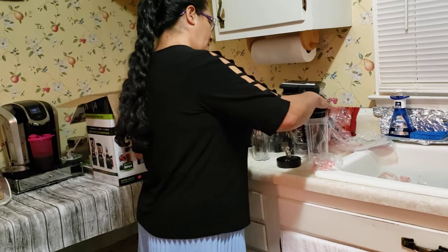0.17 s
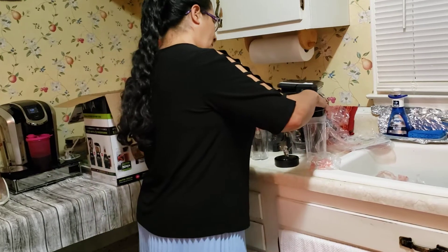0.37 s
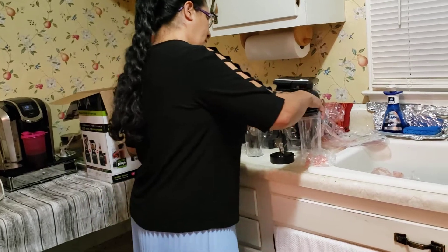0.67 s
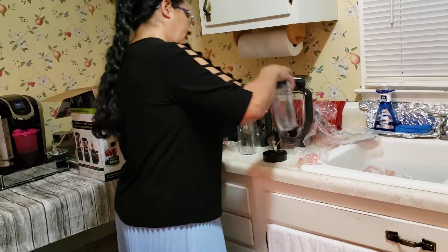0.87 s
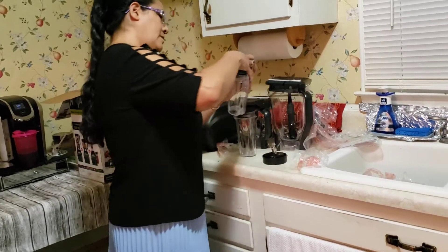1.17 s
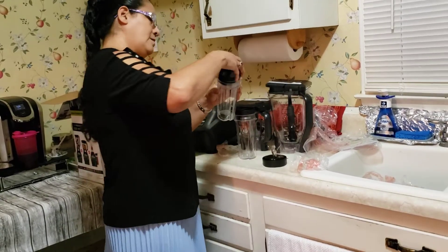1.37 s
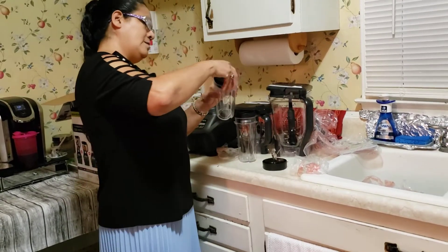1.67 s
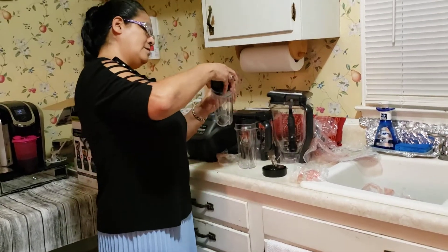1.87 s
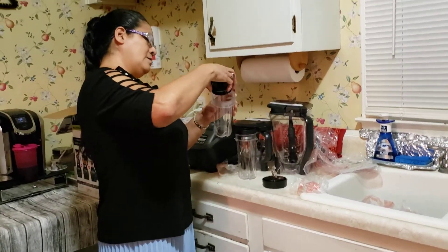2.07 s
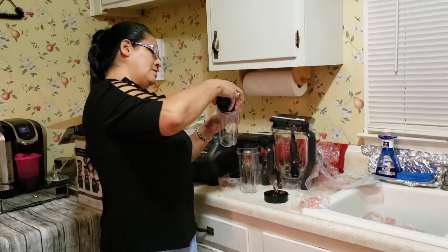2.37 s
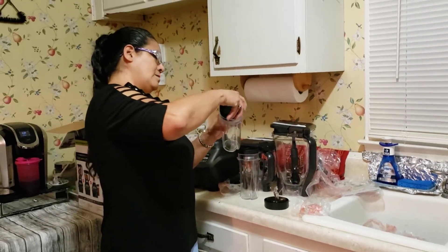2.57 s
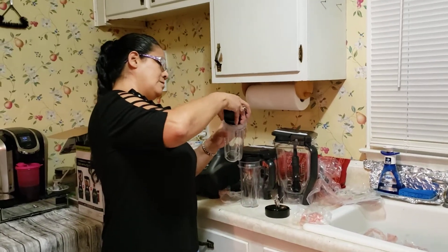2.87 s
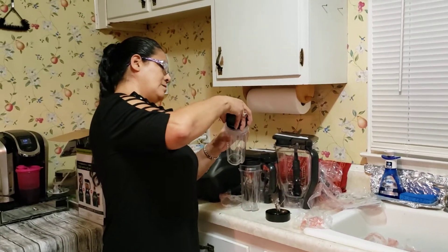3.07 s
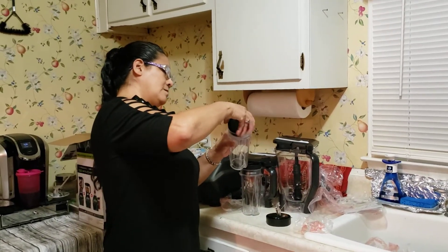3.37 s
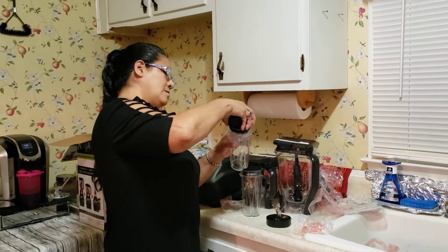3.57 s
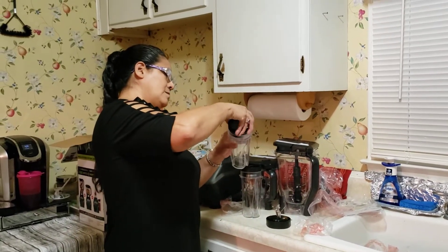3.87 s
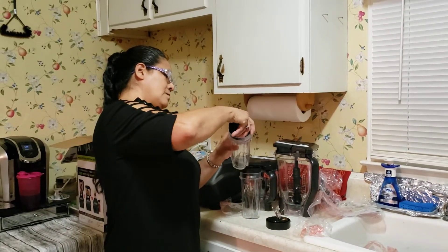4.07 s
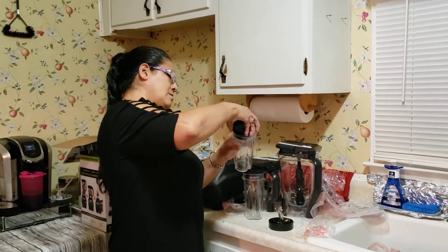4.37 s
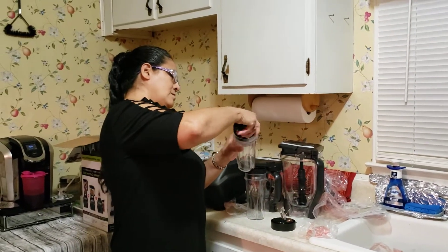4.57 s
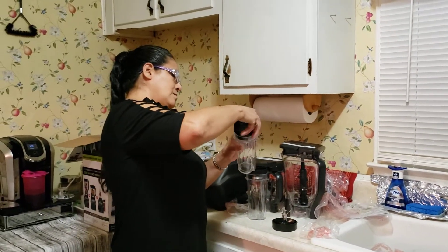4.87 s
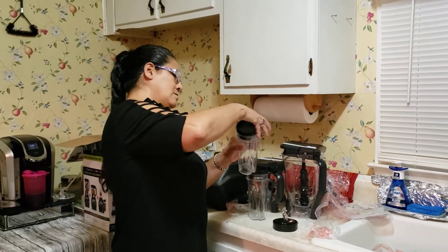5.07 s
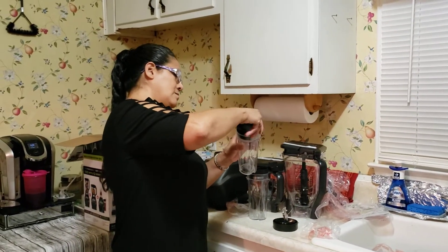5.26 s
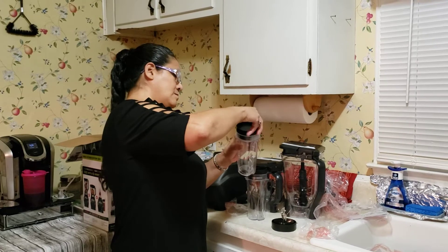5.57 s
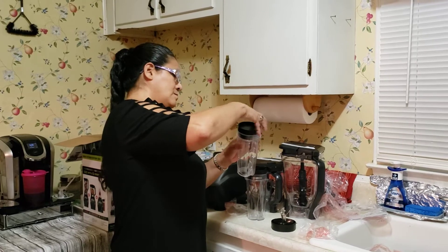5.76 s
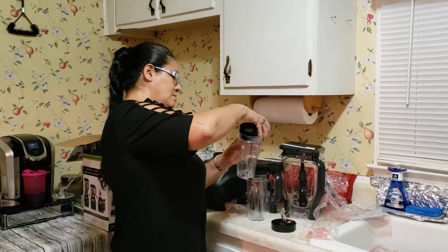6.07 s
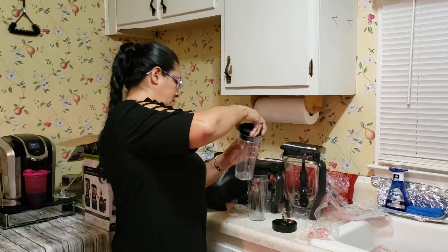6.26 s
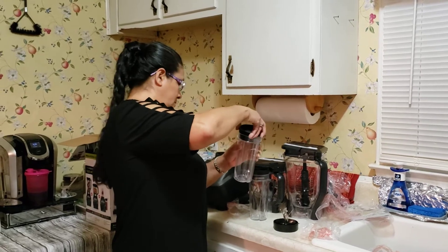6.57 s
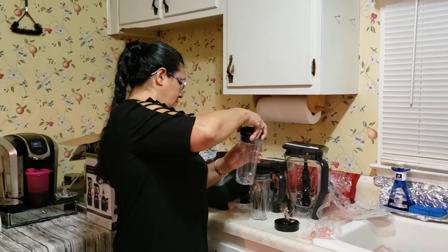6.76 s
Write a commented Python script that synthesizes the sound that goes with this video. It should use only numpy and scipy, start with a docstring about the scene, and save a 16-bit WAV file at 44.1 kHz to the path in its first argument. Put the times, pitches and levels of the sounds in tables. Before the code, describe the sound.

After brief crinkling and a sharp rim clink, a plastic lid is fitted on a cup with hollow knocks, rubs and faint squeaks.

```python
"""In a small kitchen, over low rumble, thin hiss and a faint mains hum, a hard plastic cup is drawn out of
crinkly wrapping (gated noise) and bumps the counter (blows on decaying modes), then its rim clinks.
Its lid is then pressed on and twisted: each knock or thread slip thumps the air inside, rings the wall
and ticks, while fingers rub and whisper (grainy noise); near the end the lid squeaks airily (narrow noise).
Noise-built reflections and tails answer the handling from cabinets and walls."""
import sys
import numpy as np
from scipy import signal
from scipy.fft import rfft, irfft, next_fast_len
from scipy.io import wavfile
from scipy.ndimage import uniform_filter1d

SR = 44100
rng = np.random.default_rng(int(sys.argv[2]) if len(sys.argv) > 2 else 0)


def waveform_to_disk(signal):
    """Save audio, clipped to [-1, 1], as 16-bit WAV at the path in sys.argv[1]."""
    frames = np.transpose(np.atleast_2d(signal))
    scaled = np.clip(frames, -1, 1) * 32767
    samples = np.round(scaled).astype(np.int16)
    wavfile.write(sys.argv[1], SR, samples)


N = 305110
T = np.arange(N) / SR
AGE = T[:SR * 3 // 4]  # time since a blow, s

# resonances of the cup wall: f/Hz, relative level/dB, t60/s
WALL_MODES = [(633, -5.5, 0.015), (889, -14.5, 0.043), (1090.3, -9, 0.14), (1200, -12, 0.045),
              (1381, -3.5, 0.037), (1495, -9.5, 0.018), (1740, -5.5, 0.014), (1882, 6, 0.016),
              (2000, 7, 0.0075), (2183, -14, 0.025)]
# colour of hard plastic contact: f/Hz, gain/dB
TICK_COLOUR = [(400, 17), (2000, -5), (3500, 3), (5000, 0), (7300, 5), (8700, -0.5), (11000, 4), (16000, 4)]
# a gentle contact drives little treble: f/Hz, gain/dB
SOFT_COLOUR = [(2100, -1.5), (2500, -11), (6000, -23)]


def undb(db):
    """Decibels to gain."""
    return 10 ** (np.asarray(db) / 20)


def level(x, db):
    """Set the overall rms."""
    return x * undb(db) / np.sqrt(np.mean(x ** 2))


def peak_level(x, db):
    """Set the rms of the loudest 20 ms of a stereo sound, heard as the mean of its channels."""
    power = uniform_filter1d(x.mean(0) ** 2, size=SR // 50, mode="constant")
    return x * undb(db) / np.sqrt(power.max())


def colour(x, points):
    """Minimum-phase filter through (f/Hz, gain/dB) points, so nothing sounds ahead of its cause."""
    n = 2 * next_fast_len(x.shape[-1] // 2 + SR // 20)
    hz, db = np.transpose(points)
    bin_hz = np.arange(n // 2 + 1) * SR / n
    gain = undb(np.interp(np.log(bin_hz + 1), np.log(hz), db))
    # folding the cepstrum onto positive time gives the causal phase
    cepstrum = irfft(np.log(gain))
    cepstrum[1:n // 2] *= 2
    cepstrum[n // 2 + 1:] = 0
    return irfft(rfft(x, n) * np.exp(rfft(cepstrum)))[..., :x.shape[-1]]


def balance(x, points):
    """Lean each frequency to the left or right by (f/Hz, left minus right/dB) points."""
    left = colour(x[0], [(hz, db / 2) for hz, db in points])
    right = colour(x[1], [(hz, -db / 2) for hz, db in points])
    return np.array([left, right])


def convolve(x, response):
    """Pass x through one response per channel, keeping its length."""
    return signal.fftconvolve(np.atleast_2d(x), np.atleast_2d(response), axes=-1)[:, :x.shape[-1]]


def add(out, s, x):
    """Mix x in at time s."""
    i = max(int(s * SR), 0)
    out[:, i:i + x.shape[-1]] += x[:, :N - i]


def ring(modes, detune):
    """Decaying modes; the grip shifts each a little from blow to blow."""
    out = np.zeros(len(AGE))
    for hz, db, t60 in modes:
        shifted_hz = hz * (1 + detune * rng.standard_normal())
        polarity = rng.choice([-1, 1])
        out += polarity * undb(db - 60 * AGE / t60) * np.sin(2 * np.pi * shifted_hz * AGE)
    return out


def contact(length_s, chatter):
    """A first impact, then a dying run of tiny slips."""
    happens = rng.random(len(AGE)) < 1500 / SR  # about 1500 slips a second
    slips = rng.standard_normal(len(AGE)) * happens * np.exp(-AGE / max(length_s, .001))
    force = chatter * slips / (np.linalg.norm(slips) + 1e-9)
    force[0] += 1
    return force


def grains(spread_db):
    """Dense noise at rms 1 whose size jumps unevenly every 32 samples, like micro-clicks."""
    size_db = spread_db * np.minimum(rng.exponential(size=N // 32 + 1), 6)
    size = np.repeat(undb(size_db), 32)[:N]
    return level(size * rng.standard_normal(N), 0)


def kitchen(x, wet_db, t60, early_db, width):
    """Direct sound, close reflections off cabinets and counter, then the room's tail."""
    mid, side = rng.standard_normal((2, len(AGE)))
    tail = undb(-60 * AGE / t60)
    early = undb(early_db) * np.exp(-AGE / 0.029)
    decay = (tail + early) * (1 - np.exp(-AGE / 0.0018))
    stereo = mid + width * side * np.array([[1], [-1]])
    response = stereo * decay * undb(wet_db) / np.linalg.norm(decay)
    response[:, 0] += 1  # direct sound
    return convolve(x, response)


def waver():
    """Slow random drift at rms 1, mostly below 10 Hz."""
    return level(colour(rng.standard_normal(N), [(3, 1.5), (10, -17), (60, -82.0), (300, -120)]), 0)


def background():
    """Coloured noise gives low rumble and thin hiss; sines wavering in level and phase give the hum."""
    # spectrum of the still kitchen: f/Hz, relative level/dB
    quiet_colour = [(22, -36.5), (40, -24.5), (58, -2), (85, -10), (150, -12.5), (300, -15.5), (500, -25.5),
                    (900, -39.5), (2200, -42.5), (5600, -48), (6500, -45.5), (7700, -41), (8500, -46.5),
                    (16000, -36)]
    # stereo lean: f/Hz, left minus right/dB
    quiet_lean = [(60, 4.5), (300, 1.5), (3000, 3.5), (5500, 3.5), (7200, 28), (8800, -5.5), (15000, 3)]
    # hum lines ahead of the lean: f/Hz, level/dB
    hum_lines = [(57.2, -65), (165.4, -72), (113.4, -86.5)]
    mid, side = rng.standard_normal((2, N))
    side = colour(side, [(100, -18), (300, -13), (900, -2), (3000, 0)])  # bass stays near the centre
    air = level(colour(mid + side * np.array([[1], [-1]]), quiet_colour), -63.5)
    hum = np.zeros(N)
    for hz, db in hum_lines:
        swell = 1 + 0.13 * waver()
        hum += level(swell * np.sin(2 * np.pi * hz * T + 0.16 * waver()), db)
    return balance(air + hum, quiet_lean)


def wrapping():
    """Thin film crinkles as the cup is drawn past it: each fold gives way quickly and settles slowly."""
    # crinkles: t/s, relative level/dB
    crinkles = [(0, -49), (.078, -48), (0.133, -44), (0.171, -41.5), (0.219, -61), (0.282, -44.5),
                (.34, -46.5), (0.401, -51.5), (.45, -53), (0.573, -51.5), (.665, -60)]
    # colour of the film: f/Hz, gain/dB
    film_colour = [(180, 1.5), (300, -5.5), (343, -12), (392, 4), (1080, -6), (1840, 2), (5800, 0.5),
                   (6850, 3), (8500, -0.5), (14200, 4.5), (16000, 1)]
    attack_s, fall_db_per_s = 0.004, 124.5
    folds = []
    for s, db in crinkles:
        attack = np.clip((T - s) / attack_s, 0, 1)
        folds.append(attack * undb(db - fall_db_per_s * np.maximum(T - s, 0)))
    envelope = np.linalg.norm(folds, axis=0)  # folds add in power
    crinkle = level(colour(grains(spread_db=3.5), film_colour), -3.5) * envelope
    return kitchen(crinkle, wet_db=1.5, t60=0.31, early_db=-12.5, width=1)


def counter():
    """Soft, scuffing bumps ring the counter top, which radiates little bass."""
    # bumps: t/s, level/dB, decay time of the scuff/s, brightness/dB
    bumps = [(0.001, -33.5, 0.0098, 10), (0.052, -41, 0.035, -8), (0.54, -51, 0.062, -5),
             (0.558, -41, 0.036, 2.5)]
    # resonances of the counter top: f/Hz, relative level/dB, t60/s
    top_modes = [(296, 4, 0.028), (368, -2, 0.049), (456.5, -18, 0.16), (549, -7, 0.045), (652, -1, 0.015),
                 (910, -9, 0.015), (1247, -5, 0.019), (1393, -14.5, 0.044), (1750, -7, 0.0035)]
    out = np.zeros((2, N))
    for s, db, length_s, bright_db in bumps:
        body = convolve(contact(length_s, chatter=2.1), ring(top_modes, detune=0.014))
        body = colour(body, [(60, -30), (200, -7), (300, 0), (600, bright_db), (1600, bright_db),
                             (3000, 2 * bright_db)])
        add(out, s, peak_level(kitchen(body, wet_db=1, t60=0.64, early_db=3, width=0.57), db))
    return out


def clink():
    """The hard rim snaps and rings, once clearly and twice faintly, heard mostly by way of the walls."""
    # clinks: t/s, level/dB
    clinks = [(1.085, -33.5), (1.153, -53), (2.638, -61)]
    # clearest resonances of the rim: f/Hz, relative level/dB, t60/s
    rim_modes = [(1930, 1, 0.1), (1924, -6, 0.11), (4300, -8, 0.1), (5662, -20.5, .07),
                 (5830, -14.5, 0.033)]
    # colour of the snap: f/Hz, gain/dB
    snap_colour = [(300, -4.5), (800, -9), (2000, -6.5), (2900, -6), (3450, -19.5), (4000, -0.5), (5500, 3),
                   (7200, -2), (8800, -23), (11000, -6), (15500, -9.5)]
    out = np.zeros((2, N))
    for s, db in clinks:
        snap = colour(contact(0.0006, chatter=0.66), snap_colour)
        rim = level(snap, 0) + level(ring(rim_modes, detune=.001), -9)
        add(out, s, peak_level(kitchen(rim, wet_db=28, t60=0.45, early_db=-3.5, width=0.91), db))
    return out


def rubbing():
    """With each turn the lid grates on the rim and faintly rings the wall, and the fingertips whisper."""
    # turns of the fingers: t at the height of the turn/s, relative grating level/dB
    turns = [(1.40, -77), (1.63, -50), (2.0, -54.5), (2.64, -71), (2.851, -59), (3.48, -73), (4.31, -90),
             (4.45, -74), (4.76, -84), (5.26, -58.5), (5.582, -85), (5.93, -56.5), (6.252, -67),
             (6.559, -73.5)]
    # colour of fingertips sliding on plastic: f/Hz, gain/dB
    whisper_colour = [(3000, -24), (10500, -11), (12600, -6), (13700, 0), (14700, -4), (16000, -14)]
    rise_db_per_s, fall_db_per_s = 193.5, 109
    stroke_s = 0.056  # half length of a whisper, to 1/e
    effort, strokes = np.zeros(N), np.zeros(N)
    for s, db in turns:
        effort += undb(db - np.maximum(rise_db_per_s * (s - T), fall_db_per_s * (T - s)))
        strokes += np.exp(-((T - s) / stroke_s) ** 2)
    friction = grains(spread_db=3.5) * effort
    wall = ring(WALL_MODES, detune=0.0022)
    wall_ring = convolve(colour(friction, SOFT_COLOUR), wall / np.linalg.norm(wall))
    grate = undb(-7.0) * colour(friction, TICK_COLOUR) + undb(-6.5) * wall_ring
    whisper = strokes * level(colour(grains(spread_db=7), whisper_colour), -71)
    return kitchen(undb(-4.5) * grate + whisper, wet_db=2, t60=0.16, early_db=9.5, width=1)


def squeak():
    """A swell of friction noise, passed twice through one narrow resonance, is the lid's airy squeak."""
    # squeaks: t/s, length/s, level/dB
    squeaks = [(5.767, .15, -65.5), (6.441, 0.11, -78.5)]
    squeak_hz, width_hz = 3710, 250  # width of a single pass
    out = np.zeros((2, N))
    resonance = np.exp(-np.pi * width_hz * AGE) * np.sin(2 * np.pi * squeak_hz * AGE)
    for s, length_s, db in squeaks:
        swell = np.sin(np.pi * np.clip(AGE / length_s, 0, 1))
        friction = rng.standard_normal(len(AGE)) * swell
        tone = convolve(convolve(friction, resonance), resonance)
        add(out, s, peak_level(kitchen(tone, wet_db=9, t60=0.6, early_db=-14, width=0.97), db))
    return out


def clacks():
    """The lid's hard edge lands on the bare rim and chatters to rest."""
    # landings: t/s, level/dB
    landings = [(1.457, -46), (2.454, -50), (2.48, -46.5), (3.068, -54), (3.086, -56.5), (3.906, -55),
                (4.943, -58), (6.294, -50.5)]
    # colour of the edge's crack: f/Hz, gain/dB
    crack_colour = [(700, -6), (1300, 3.5), (2300, -13.5), (2700, 10), (3100, -4), (3700, 7.5), (4600, -2),
                    (6500, -22.5)]
    out = np.zeros((2, N))
    for s, db in landings:
        crack = colour(contact(0.027, chatter=1.3), crack_colour)
        add(out, s, peak_level(kitchen(crack, wet_db=5.5, t60=0.44, early_db=4.0, width=0.86), db))
    return out


def graze(length_s, db):
    """The light scrape that leads into a knock and sets the wall ringing."""
    scrape = colour(contact(length_s, chatter=2.8), SOFT_COLOUR)
    wall = convolve(scrape, ring(WALL_MODES, detune=.004))
    return peak_level(kitchen(wall, wet_db=11.5, t60=0.21, early_db=0, width=1.0), db)


def air_thump(hz, swell_s):
    """The lid pumps the air in the cup: a few cycles that swell and leak away."""
    envelope = (AGE / swell_s) ** 2 * np.exp(-2 * AGE / swell_s)
    return envelope * np.sin(2 * np.pi * hz * AGE)


def cup(air_hz, air_db, wall_db, upper_db, tick_db, slip_s):
    """One contact of the lid thumps the air, rings the lower and upper wall modes and ticks."""
    split_hz = 1600
    low_modes = [m for m in WALL_MODES if m[0] < split_hz]
    high_modes = [m for m in WALL_MODES if m[0] >= split_hz]
    # a long slip judders, so its thump is rougher than that of a clean catch
    thump = convolve(contact(slip_s, chatter=slip_s / 0.015), air_thump(air_hz, swell_s=0.0082))
    air = kitchen(thump, wet_db=-4.5, t60=0.47, early_db=-9.5, width=0.16)
    # one force drives wall and tick alike
    force = contact(slip_s, chatter=3.23)
    low_ring = convolve(force, ring(low_modes, detune=0.0053))
    low = kitchen(low_ring, wet_db=0.5, t60=0.39, early_db=-2.5, width=0.93)
    high_ring = convolve(force, ring(high_modes, detune=.005))
    high = kitchen(high_ring, wet_db=4.5, t60=0.53, early_db=3.5, width=1)
    tick = kitchen(colour(force, TICK_COLOUR), wet_db=4, t60=0.63, early_db=4.0, width=0.82)
    wall = peak_level(low, wall_db) + peak_level(high, wall_db + upper_db)
    return peak_level(air, air_db) + wall + peak_level(tick, tick_db)


def lid():
    """Knocks as the lid catches on the cup, and softer, mostly longer slips of its thread."""
    # knocks: t/s, air thump level/dB, lower wall ring over the thump/dB, edge tick over the thump/dB
    knocks = [(1.367, -42.5, -6.5, -22.5), (1.452, -53.5, 17.5, -2), (1.459, -39, 2, -0.5),
              (1.532, -33, -12.5, -18.5), (1.675, -40, -6.5, -21), (1.854, -42, -12, -6.5),
              (1.891, -42.5, -9, -12), (1.961, -45.5, -20, -10.5), (2.41, -46, -12, -5.5),
              (2.453, -34.5, -1.5, -13), (2.477, -37, -2.5, -8.5), (3.038, -72.5, -7, 11.5),
              (3.067, -50.5, 3.5, -7.5), (3.085, -47, 5.5, -30), (3.203, -47, -7, -3.5),
              (3.22, -40, -13.5, -9.5), (3.738, -50, -14.5, -4), (3.775, -47.5, -10, -10.5),
              (3.906, -40.5, -4, -9), (3.971, -41.5, -5.5, -23), (4.03, -46.5, -1, -4.5),
              (4.115, -40, -11, -17.5), (4.535, -42.5, -10.5, -8.5), (4.628, -43, -2.5, -17),
              (4.654, -41, -6, -22), (4.682, -38.5, -7.5, -27), (4.865, -46.5, -2.5, 1.5),
              (4.927, -39, -11, -17.5), (4.943, -34.5, -5, -18.5), (5.28, -43.5, -1.5, -7),
              (5.614, -37.5, -6, -15.5), (6.224, -46, -35, -48), (6.292, -43.5, -1.5, -1)]
    # juddering thread slips: t/s, air thump level/dB, air note f/Hz, decay time of the judder/s
    thread_slips = [(2.019, -56, 333, 0.004), (2.338, -48.5, 410, 0.042), (2.666, -47, 297, 0.027),
                    (2.771, -46.5, 304, 0.031), (3.086, -45.5, 365, 0.063), (3.529, -53.5, 314, 0.036),
                    (3.878, -50.5, 305, 0.024), (4.327, -55.5, 272, 0.08), (4.456, -53.5, 267, .029),
                    (4.494, -47.5, 276, 0.014), (4.829, -47, 290, 0.023), (5.224, -46.5, 284, 0.12),
                    (5.538, -49, 298, 0.077), (5.587, -44, 278, 0.013), (5.89, -54, 259, 0.063)]
    thump_hz, seated_s, sag_hz_per_s = 288.7, 4.77, 17.4  # knocks sink once the thread closes the gap
    firm_db, firm_chatter_s, doubling_db = -45, 0.0079, 28  # harder blows chatter longer
    graze_s, graze_db = 0.0092, -57.5  # lead and scrape decay; level of a full graze
    graze_full_db = -45.5  # knocks that ring the wall less than this are grazed less too
    out = np.zeros((2, N))
    for s, db, wall_db, edge_db in knocks:
        air_hz = thump_hz - sag_hz_per_s * max(s - seated_s, 0)
        blow_db = db + (wall_db + edge_db) / 2  # how hard plastic meets plastic
        chatter_s = firm_chatter_s * 2 ** ((blow_db - firm_db) / doubling_db)
        add(out, s, cup(air_hz, db, db + wall_db, -2.5, db + edge_db, chatter_s))
        graze_gain = min(undb(db + wall_db - graze_full_db), 1)
        add(out, s - graze_s, graze(graze_s, graze_db) * graze_gain)
    for s, db, air_hz, length_s in thread_slips:
        # soft slips ring the upper wall modes less: -10 dB against the lower ones
        add(out, s, cup(air_hz, db, db - 10, -10, db - 15.5, length_s))
    return out


def scene():
    """The handling, heard from the side, over the still kitchen."""
    # stereo lean of the handling: f/Hz, left minus right/dB
    handling_lean = [(300, 1.2), (700, 4.5), (1090, 3.5), (1450, -2.5), (2000, 0.5), (3200, 2.5),
                     (5000, 6.5), (7000, 9.5), (9000, 0.5), (14000, -0.5)]
    handling = wrapping() + counter() + clink() + rubbing() + squeak() + clacks() + lid()
    return background() + balance(handling, handling_lean)


def record(dry):
    """A steep elliptic low-pass ends the treble just below 16 kHz."""
    return signal.sosfilt(signal.ellip(10, .2, 70, 15950, fs=SR, output="sos"), dry)


dry = scene()
out = record(dry)
waveform_to_disk(out)
```